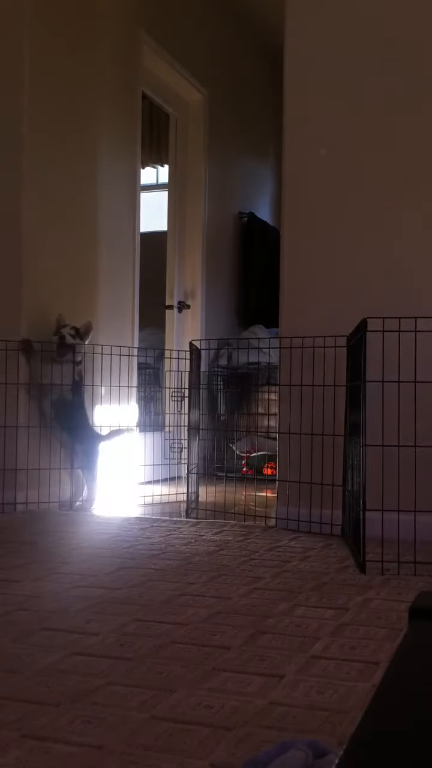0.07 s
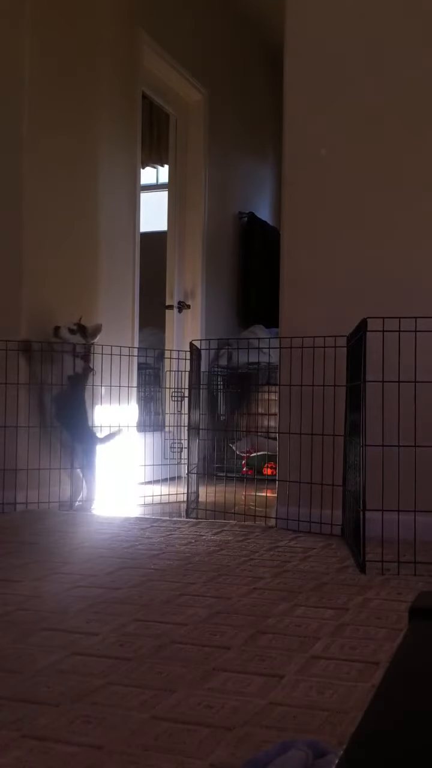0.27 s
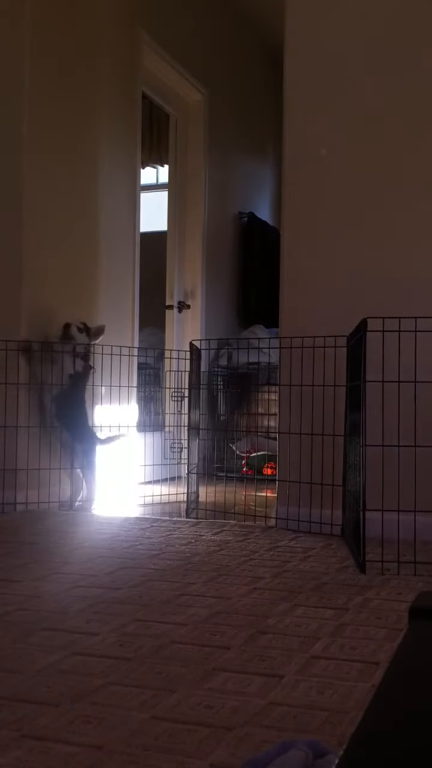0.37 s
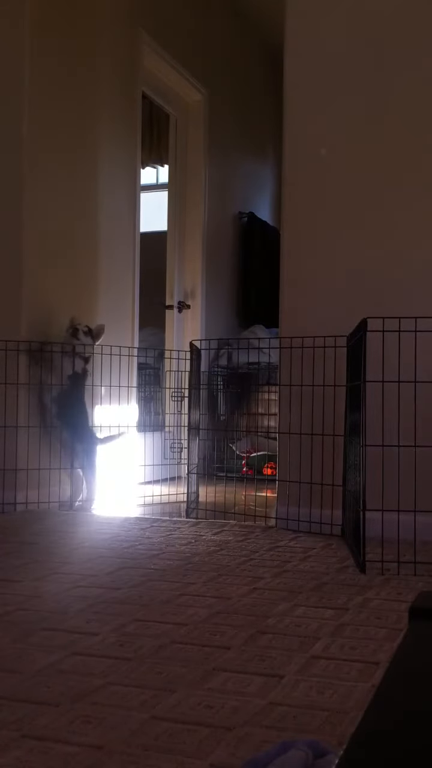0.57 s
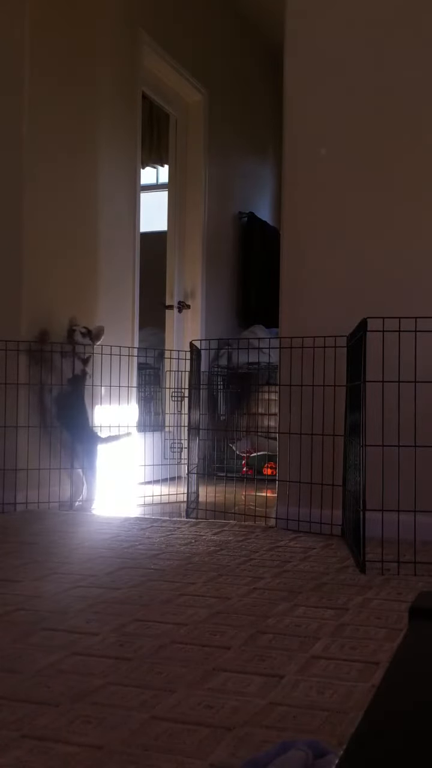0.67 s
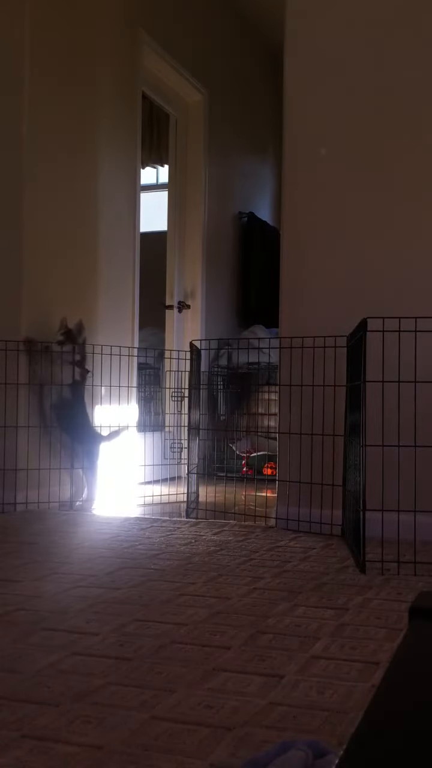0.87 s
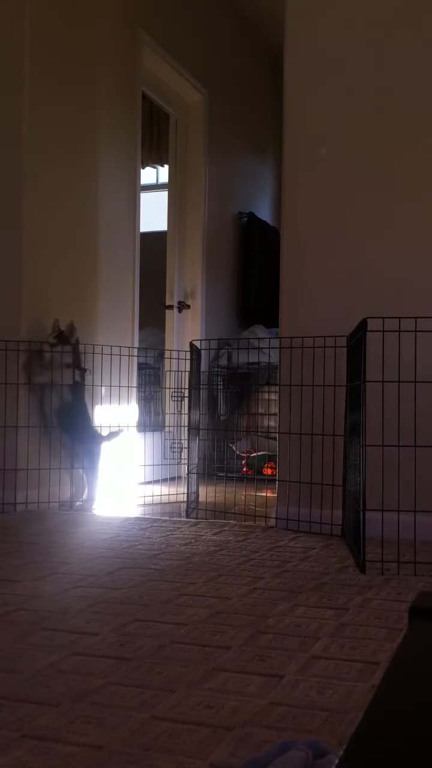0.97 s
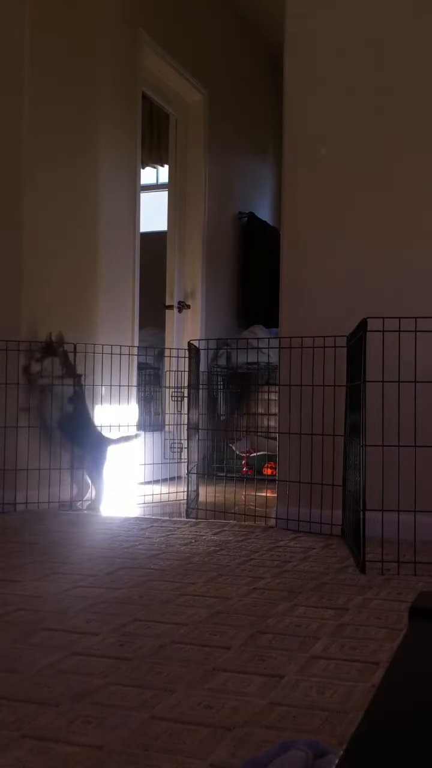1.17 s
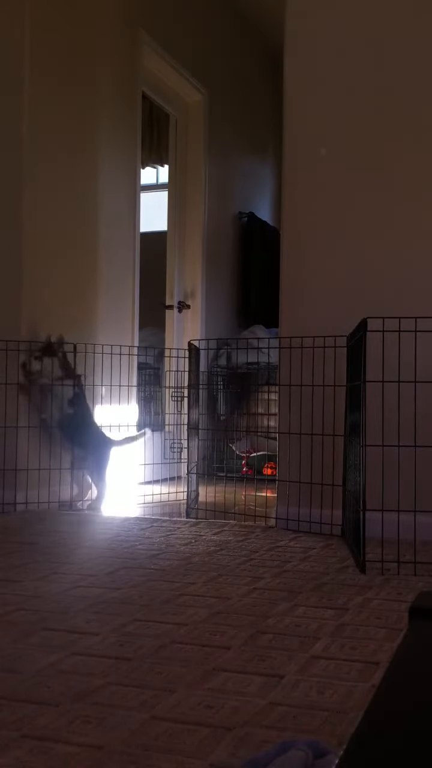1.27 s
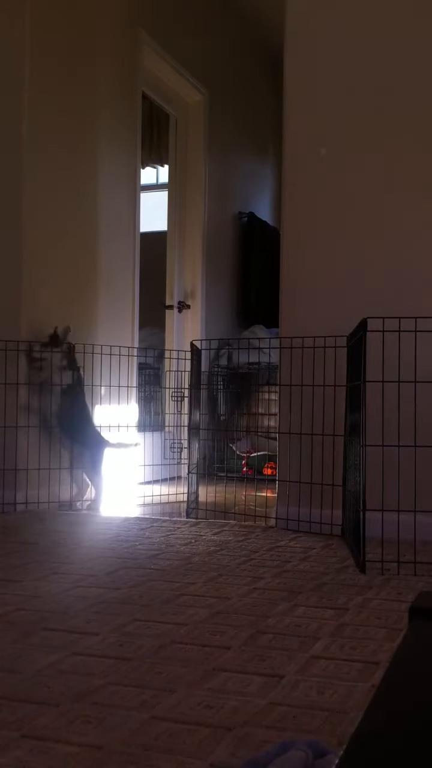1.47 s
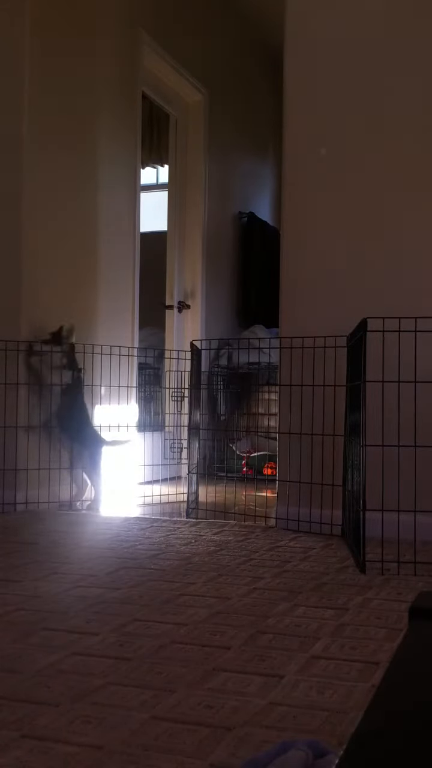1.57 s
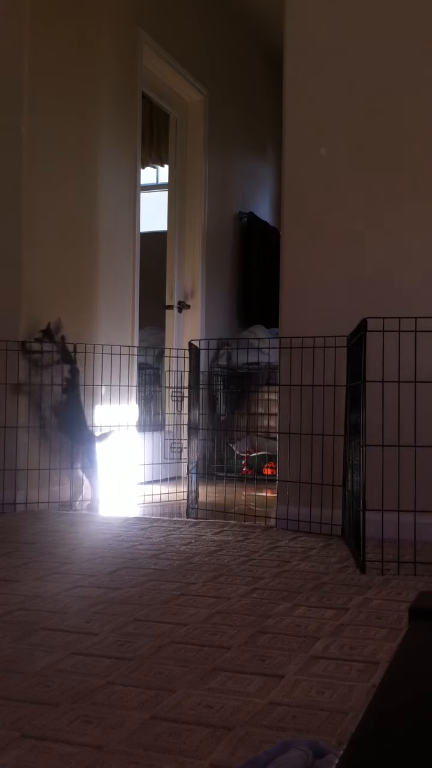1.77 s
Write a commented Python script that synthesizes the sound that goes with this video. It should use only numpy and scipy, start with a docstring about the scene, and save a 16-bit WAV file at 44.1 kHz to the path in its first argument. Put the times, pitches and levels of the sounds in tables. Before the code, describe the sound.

A puppy gives one loud hoarse bark, a piercing yelp, then weaker barks and squeaks, its paws thumping and rattling a wire pen; hard, reverberant room, phone microphone at some distance, faint low rumble behind.

```python
"""A husky puppy barks hoarsely over a low rumble, the first bark already under way at the start.
Paws thump, rattle and scrape at a wire pen and wall, as filtered noise, contact grains and panel modes.
Barks are uneven pulse trains and noise through throat resonances; some settle on a clean pitch.
Thin whistles are gliding sines, and yelps are high gliding harmonic tones with a trace of rasp.
A hard-floored room answers every sound with early reflections and a decaying tail."""
import sys
import numpy as np
from scipy import signal
from scipy.fft import rfft, irfft
from scipy.io import wavfile
from scipy.ndimage import uniform_filter1d, minimum_filter1d

SR = 44100
rng = np.random.default_rng(int(sys.argv[2]) if len(sys.argv) > 2 else 0)


def wrap_up_sound(samples):
    """Save the sound to the file named by the first command line argument, as 16-bit audio."""
    columns = np.atleast_2d(samples).T
    # keep every value between -1 and 1, then stretch to whole-number steps
    tamed = np.clip(columns, -1, 1)
    steps = np.round(tamed * 32767).astype(np.int16)
    wavfile.write(sys.argv[1], SR, steps)


N = 79380


def undb(db):
    """Level as a logarithmic ratio: decibels to amplitude gain."""
    return 10 ** (np.asarray(db) / 20)


def unit(x):
    """Normalisation by mean power: scale to rms 1."""
    return x / np.sqrt(np.mean(x ** 2) + 1e-20)


def by_hz(hz, points):
    """Interpolation of (Hz, value) points along logarithmic frequency."""
    point_hz, value = np.array(points, float).T
    return np.interp(np.log(np.maximum(hz, 1)), np.log(point_hz), value)


def colour(x, points):
    """Spectral shaping: weight a signal by (Hz, dB) points, then scale to rms 1."""
    gain = undb(by_hz(np.fft.rfftfreq(N, 1 / SR), points))
    return unit(irfft(rfft(x) * gain, N))


def cut(x, hz, kind, order):
    """Butterworth filtering, with a maximally flat passband."""
    sos = signal.butter(order, np.minimum(hz, SR / 2 - 100), kind, fs=SR, output="sos")
    return signal.sosfilt(sos, x)


def resonate(x, hz, width_hz):
    """Resonance of a damped oscillator, applied forward and backward for steep skirts."""
    b, a = signal.iirpeak(hz, hz / width_hz, fs=SR)
    return signal.filtfilt(b, a, x)


def wobble(hz):
    """Random modulation: low-passed noise up to about the given rate, rms 1."""
    return unit(cut(rng.standard_normal(N), hz, "low", order=2))


def grains():
    """Dense impact noise: brief contacts of random size at random instants."""
    contacts_per_s = 5000
    return rng.standard_normal(N) * (rng.random(N) < contacts_per_s / SR)


def rumble():
    """Stationary background noise of the house, shaped by a fixed spectrum."""
    # Each row: frequency in Hz, relative level in dB.
    rumble_spectrum = [(20, -37), (50, -44), (80, -23), (125, 1), (200, 1), (320, -5.5), (600, -17),
                       (1500, -33), (4000, -25.5), (9000, -25.5), (15500, -42.5)]
    return undb(-56) * colour(rng.standard_normal(N), rumble_spectrum)


def bark_throat(x, mouth_hz, low_db, middle_db, treble_db, air_db):
    """Source-filter principle: parallel vocal-tract resonances, with a little air above them."""
    # Treble resonances. Each row: frequency in Hz, width in Hz, relative level in dB.
    treble_resonances = [(3448, 420, -1), (4020, 680, -5)]
    y = resonate(x, mouth_hz, width_hz=174)
    y = y + undb(low_db) * resonate(x, 710, width_hz=175)
    y = y + undb(middle_db) * resonate(x, 2080, width_hz=1350)
    for hz, width_hz, db in treble_resonances:
        y = y + undb(treble_db + db) * resonate(x, hz, width_hz)
    y = cut(y, 4950, "low", order=10)
    y = cut(y, 394, "high", order=4)
    air = resonate(x, 9260, width_hz=7300)
    return unit(y + undb(air_db) * air)


def barks(t):
    """Period doubling: alternately strong and weak vocal pulses, with noise modulated at their rate."""
    # Each row: start in seconds, rise in seconds, time from start to release in seconds,
    # first pitch in Hz, pitch at the end of the rise in Hz, voice level in dB, rasp level in dB,
    # mouth resonance in Hz, then levels of the low, middle and treble resonances, of the air
    # and of the nearly closed mouth, all in dB.
    bark_rows = [(-.01, 0.022, 0.052, 624, 693.4, -42, -36, 1390, -10.5, -11, -23, -37, -52),
                 (0.204, 0.046, 0.085, 603.7, 710.9, -14.5, -15.5, 1462, -17.5, -6.5, -7.5, -35, -42.5),
                 (0.719, 0.048, 0.082, 703, 721, -38.5, -33.5, 1204, -10.5, -11.5, -6.5, -39, -61),
                 (1.1, 0.0636, 0.095, 520, 580.7, -42.5, -38, 1227, -9, -47, -21, -56, -50.5),
                 (1.352, 0.047, 0.07, 565.3, 599, -34, -33.5, 1282, -13, -14, -13.5, -50, -45),
                 (1.404, 0.025, 0.045, 699.7, 715, -31.5, -33.5, 1322, -9.5, -23.5, -21.5, -43.5, -53)]
    release_s, sag_hz_per_s = 0.0098, 356
    jitter, shimmer = 0.0181, 0.17  # random shares of pitch and of amplitude
    half_pitch_db, source_tilt = -4.5, 0.32  # tilt: power of harmonic number by which level falls
    opening_s = 0.015  # while the jaw opens, the nearly closed mouth rings low
    out = 0
    for (start, rise, length, first_hz, top_hz, voice_db, rasp_db, mouth_hz,
         low_db, middle_db, treble_db, air_db, closed_db) in bark_rows:
        age = t - start
        effort = np.clip(age / rise, 0, 1)
        envelope = effort ** 1.01 * np.exp(-np.maximum(age - length, 0) / release_s)

        hz = first_hz + (top_hz - first_hz) * np.sin(effort * np.pi / 2)
        hz = hz - sag_hz_per_s * np.clip(age - rise, 0, length)
        phase = 2 * np.pi * np.cumsum(hz * (1 + jitter * wobble(hz=297))) / SR

        folds = 0
        for k in range(1, 9):
            half_pitch = undb(half_pitch_db) * np.cos((k + .5) * phase)
            folds = folds + (np.cos(k * phase) + half_pitch) / k ** source_tilt
        folds = folds * (1 + shimmer * wobble(hz=187))
        rasp = rng.standard_normal(N) * (1 + 0.3 * np.cos(phase)) * (1 + 0.18 * wobble(hz=150))

        tract = mouth_hz, low_db, middle_db, treble_db, air_db
        voice = undb(voice_db) * bark_throat(folds, *tract)
        hoarseness = undb(rasp_db) * bark_throat(rasp, *tract)
        opening = np.maximum(age, 0) / opening_s
        mouth_ring = unit(resonate(rasp, 485, width_hz=210))
        closed = opening * np.exp(1 - opening) * undb(closed_db) * mouth_ring
        out = out + closed + envelope * (voice + hoarseness)
    return out


def paws(t):
    """Impact excitation: blows ring decaying panel modes, shake the pen and tick with the claws."""
    # Each row: start in seconds, thump level in dB, pen rattle level in dB, claw tick level in dB.
    blow_rows = [(0.116, -45.5, -52, -86), (0.273, -48, -47, -49), (.637, -46.5, -46.5, -69),
                 (0.914, -73, -46, -59), (1.014, -59, -76, -53), (1.196, -68, -66, -75),
                 (1.501, -42, -41.5, -58.5), (1.57, -48, -54, -75)]
    # Modes of the struck panel. Each row: frequency in Hz, level in dB, 60 dB decay time in seconds.
    panel_modes = [(125, -6, 0.28), (189.7, -5, 0.53)]
    # Spectra of the thump, the pen and the claws. Each row: frequency in Hz, relative level in dB.
    thump_spectrum = [(45, -29), (75, -9), (115, -7), (185, -2), (270, -5), (500, -13.5), (1500, -33)]
    rattle_spectrum = [(300, -13), (650, -5), (1250, -7), (2000, -13.5), (4000, -51.5), (9000, -53)]
    claw_spectrum = [(2000, -11), (4500, 1), (7000, 12.5), (10000, 6), (15000, -6)]
    rise_s, decay_s = 0.0039, 0.056
    out = 0
    for start, thump_db, rattle_db, claw_db in blow_rows:
        age = np.maximum(t - start, 0)
        push = np.minimum(age / rise_s, 1)
        envelope = push * np.exp(-np.maximum(age - rise_s, 0) / decay_s)
        ring = 0
        for hz, db, t60 in panel_modes:
            ring = ring + push * undb(db - 60 * age / t60) * np.sin(2 * np.pi * hz * age)
        thump = ring + envelope * colour(rng.standard_normal(N), thump_spectrum)
        rattle = undb(rattle_db) * colour(grains(), rattle_spectrum)
        claws = undb(claw_db) * colour(grains(), claw_spectrum)
        out = out + undb(thump_db) * thump + envelope * (rattle + claws)
    return out


def clear_voice(t):
    """Periodic phonation: within a bark the folds briefly give a clean pitch and its octave."""
    # Each row: start in seconds, length in seconds, first pitch in Hz, last pitch in Hz,
    # fundamental level in dB, octave level in dB.
    clear_rows = [(.232, .08, 712, 698, -33, -40), (.278, .036, 692, 680, -42, -18),
                  (.735, .055, 710, 704, -41, -50), (1.412, .036, 722, 715, -41, -38)]
    out = 0
    for start, length, first_hz, last_hz, fundamental_db, octave_db in clear_rows:
        u = np.clip((t - start) / length, 0, 1)
        hz = (first_hz + (last_hz - first_hz) * u) * (1 + .008 * wobble(hz=252))
        phase = 2 * np.pi * np.cumsum(hz) / SR
        tone = undb(fundamental_db) * np.sin(phase) + undb(octave_db) * np.sin(2 * phase)
        out = out + np.sqrt(2 * np.abs(np.sin(np.pi * u))) * tone
    return out


def whines(t):
    """Frequency modulation: nearly pure nasal whines and whistles glide alongside the voice."""
    # Each row: start in seconds, length in seconds, first frequency in Hz,
    # last frequency in Hz, level in dB.
    whine_rows = [(0.311, 0.034, 8680, 8990, -38.5), (0.333, 0.063, 8850, 8400, -44.5),
                  (0.502, 0.057, 8250, 8670, -43), (0.529, 0.03, 8960, 8770, -35),
                  (0.54, 0.0182, 8600, 7620, -38.5), (0.548, 0.038, 8100, 7970, -39.5),
                  (0.765, 0.049, 8460, 8250, -43), (0.771, 0.085, 1171, 1219, -37.5),
                  (0.828, 0.078, 8350, 8410, -53.5), (0.897, 0.047, 8400, 8700, -57),
                  (1.143, .065, 8420, 8740, -52.5), (1.154, 0.038, 1120, 1180, -41.5)]
    out = 0
    for start, length, first_hz, last_hz, db in whine_rows:
        u = np.clip((t - start) / length, 0, 1)
        hz = (first_hz + (last_hz - first_hz) * u) * (1 + 0.00403 * wobble(hz=257))
        swell = np.sqrt(2 * np.abs(np.sin(np.pi * u)))
        out = out + undb(db) * swell * np.sin(2 * np.pi * np.cumsum(hz) / SR)
    return out


def yelps(t):
    """Register break: the voice jumps to a high gliding harmonic tone with a trace of rasp."""
    # One curve for each yelp. Each row: time in seconds, pitch in Hz, level in dB.
    yelp_curves = [
        [(.405, 1890, -32), (.425, 1765, -32), (.445, 1794, -27), (.458, 1603, -25.5), (.474, 1588, -23.5),
         (.49, 1752, -18.5), (.507, 1916, -23.5), (.535, 2061, -26.5), (.555, 1782, -24.5)],
        [(.765, 1396, -45.5), (.783, 1610, -31.5), (.797, 1878, -27.5), (.812, 1952, -33), (.835, 1892, -33),
         (.855, 1784, -34.5)],
        [(1.135, 1480, -39.5), (1.158, 1640, -35.5), (1.18, 1621, -36.5), (1.222, 1593, -39),
         (1.25, 1569, -48.5)],
    ]
    # One value for each yelp: level of the octave in dB.
    octave_levels = [0, -3.5, -18]
    # One value for each yelp: pitch unsteadiness as a share of the pitch.
    pitch_jitters = [.02, .02, .008]
    # Levels of the 3rd to 7th harmonics in dB.
    overtone_levels = [-30, -35, -33, -42, -49]
    # The throat favours the octave when it is low. Each row: octave frequency in Hz, gain in dB.
    octave_gain = [(3200, 4), (3500, 0), (3800, -8), (4050, -10.5)]
    # Each row: frequency in Hz, relative level in dB.
    rasp_spectrum = [(1100, -31), (1500, -20), (2100, -9), (2750, -2), (3300, -5), (3800, -10),
                     (5000, -2.5), (5800, -22), (7500, -15), (13000, -29), (15000, -27)]
    shimmer, rasp_db, edge_s = 0.27, -19.5, 0.0044  # rasp is relative to the tone
    out = 0
    for curve, octave_db, jitter in zip(yelp_curves, octave_levels, pitch_jitters):
        s, pitch_hz, db = np.array(curve).T
        hz = np.interp(t, s, pitch_hz)
        phase = 2 * np.pi * np.cumsum(hz * (1 + jitter * wobble(hz=336))) / SR
        octave = octave_db + by_hz(2 * hz, octave_gain)
        tone = 0
        for k, harmonic_db in enumerate([0, octave, *overtone_levels], start=1):
            tone = tone + undb(harmonic_db) * np.sin(k * phase)
        rasp = undb(rasp_db) * colour(rng.standard_normal(N), rasp_spectrum)
        gate = np.clip(np.minimum(t - s[0], s[-1] - t) / edge_s, 0, 1)
        level = gate * undb(np.interp(t, s, db)) * (1 + shimmer * wobble(hz=231))
        out = out + (unit(tone) + rasp) * level
    return out


def scrape(t):
    """Sliding friction: a paw slides down the wall as dense contacts under changing pressure."""
    # Each row: frequency in Hz, relative level in dB.
    scrape_spectrum = [(300, -2), (900, -3), (1800, -1.5), (2800, 6.5), (5500, -1), (9500, -7),
                       (15000, -13.5)]
    start_s, peak_s, end_s = 1.619, 1.678, 1.759
    pressure = np.interp(t, [start_s, peak_s, end_s], [0, 1, 0]) ** 0.95
    return undb(-43.5) * pressure * colour(grains(), scrape_spectrum)


def room(x, t):
    """Reverberation: direct sound, early reflections and a tail whose decay depends on frequency."""
    # Each row: frequency in Hz, 60 dB decay time in seconds.
    decay_times = [(100, 0.55), (700, 0.48), (1600, 0.67), (3500, 0.52), (8500, 0.46), (15000, 0.39)]
    direct_db, early_db, early_decay_s = 3, 6.5, 0.0096  # levels relative to the tail
    even_hz = 70  # width over which the response is evened, so no broad band stands out
    f, spectrum = np.fft.rfftfreq(N, 1 / SR), rfft(rng.standard_normal(N))
    edges = [0, 300, 600, 1100, 2400, 5000, 10000, SR]  # decay bands, Hz
    tail = 0
    for lo, hi in zip(edges, edges[1:]):
        band = irfft(spectrum * ((f >= lo) & (f < hi)), N)
        t60 = by_hz((lo + hi) / 2, decay_times)
        tail = tail + band * np.exp(-np.log(1000) * t / t60)
    early = grains() * np.exp(-t / early_decay_s)
    reflections = (unit(tail) + undb(early_db) * unit(early)) / np.sqrt(N)
    gain = rfft(reflections + undb(direct_db) * (t == 0))
    gain = gain / np.sqrt(uniform_filter1d(np.abs(gain) ** 2, size=int(even_hz * N / SR)))
    response = irfft(gain, N)[:N // 2]
    return signal.fftconvolve(x, response / np.linalg.norm(response))[:N]


def scene():
    """Superposition: the dog and its paws sound in the room, over the rumble of the house."""
    t = np.arange(N) / SR
    dog = barks(t) + paws(t) + clear_voice(t) + whines(t) + yelps(t) + scrape(t)
    return (room(dog, t) + rumble())[None]


def record(dry):
    """Transducer response and peak limiting: the phone colours, limits and cuts the top treble."""
    # Each row: frequency in Hz, gain in dB.
    microphone_response = [(20, -15), (50, -13), (100, -2.5), (860, -1), (980, 2.5), (1100, -0.5),
                           (5000, -0.5), (5700, 2), (6700, 0.5), (13500, 1.5), (15000, -3)]
    limit, window_s = undb(-3.5), .004
    colouring = undb(by_hz(np.fft.rfftfreq(2 * N, 1 / SR), microphone_response))
    heard = irfft(rfft(dry, 2 * N) * colouring)[:, :N]
    size = int(window_s * SR)
    gain = limit / np.maximum(np.abs(heard), limit)
    # hold the lowest gain around each peak, then smooth it
    heard = heard * uniform_filter1d(minimum_filter1d(gain, size=size), size=size)
    top_hz = 15650
    return signal.sosfilt(signal.ellip(10, .2, 80, top_hz, fs=SR, output="sos"), heard)


dry = scene()
out = record(dry)
wrap_up_sound(out)
```